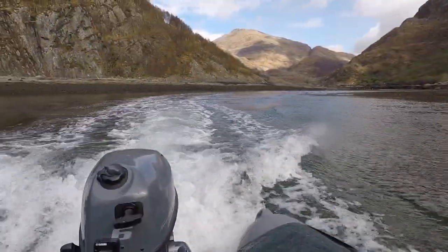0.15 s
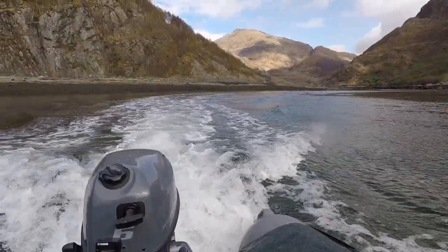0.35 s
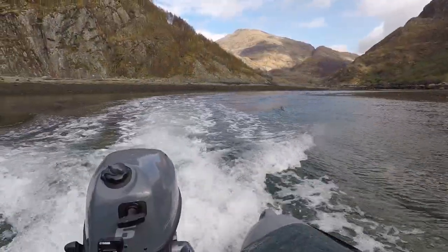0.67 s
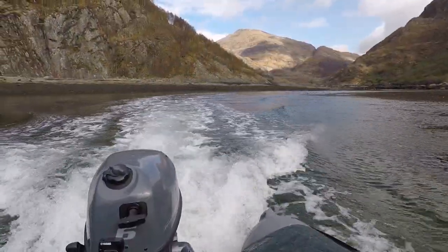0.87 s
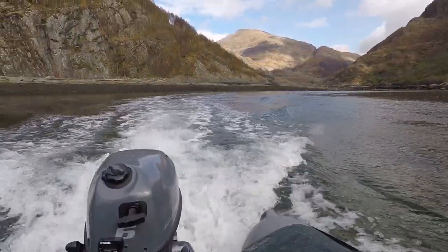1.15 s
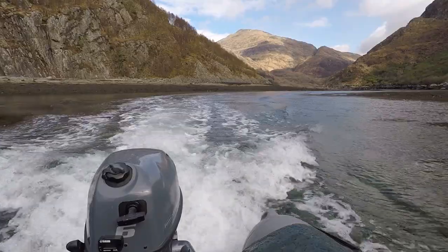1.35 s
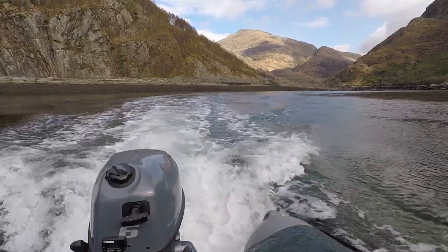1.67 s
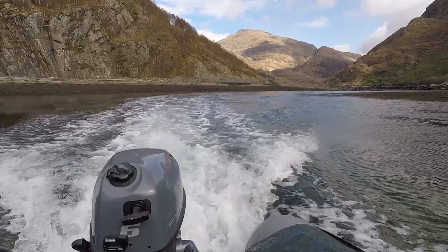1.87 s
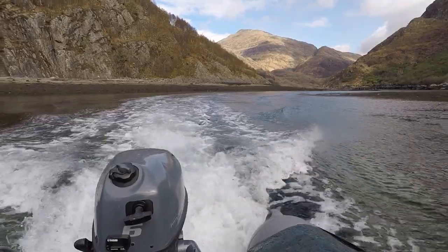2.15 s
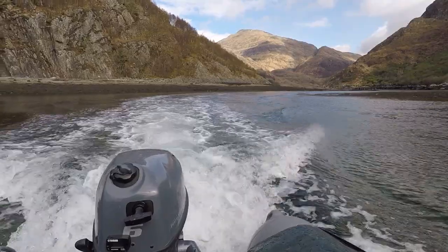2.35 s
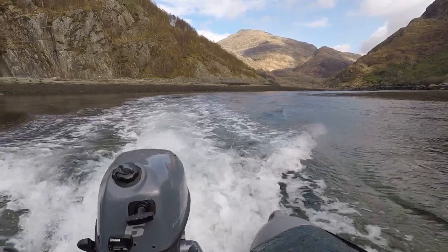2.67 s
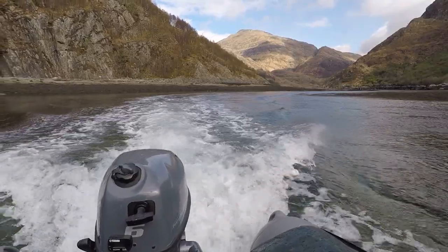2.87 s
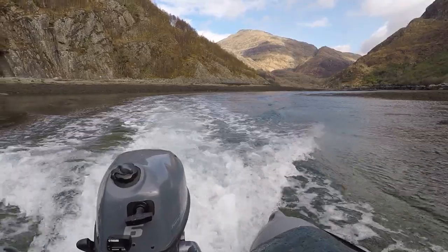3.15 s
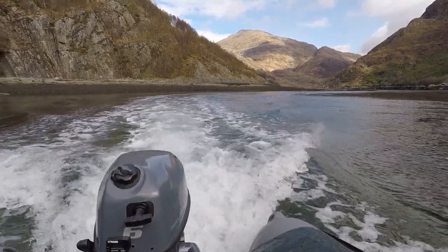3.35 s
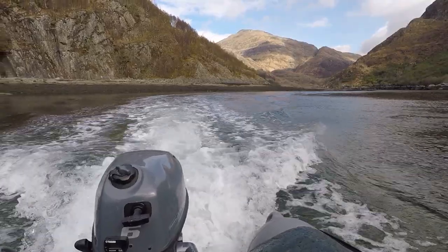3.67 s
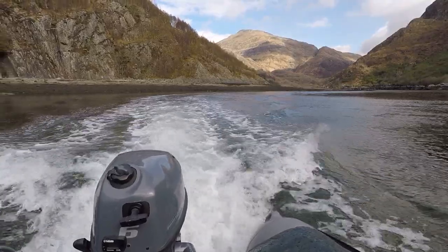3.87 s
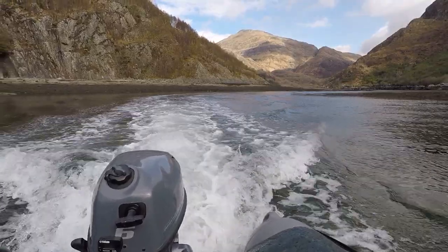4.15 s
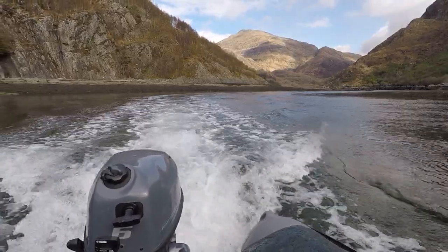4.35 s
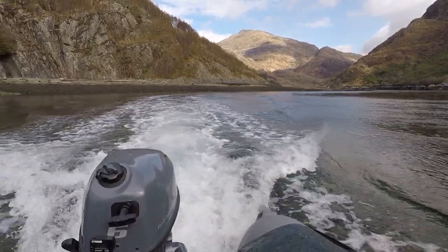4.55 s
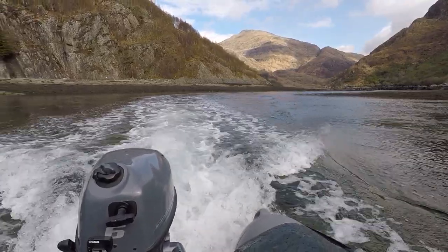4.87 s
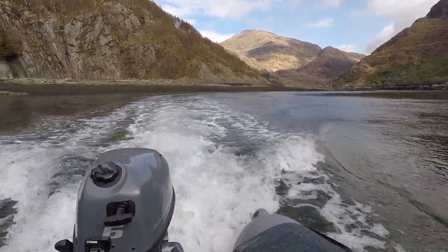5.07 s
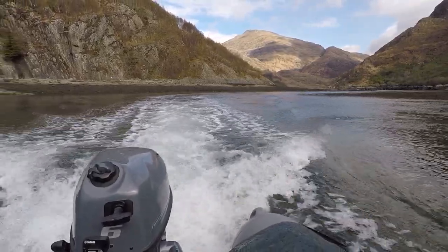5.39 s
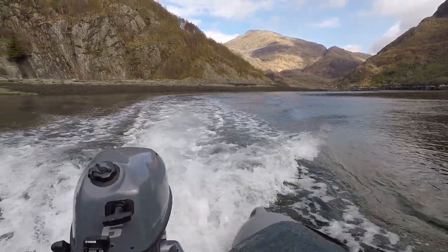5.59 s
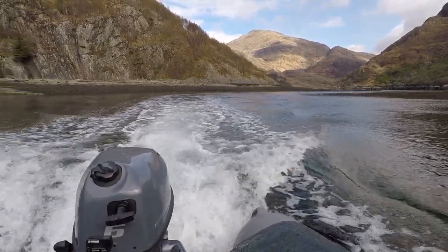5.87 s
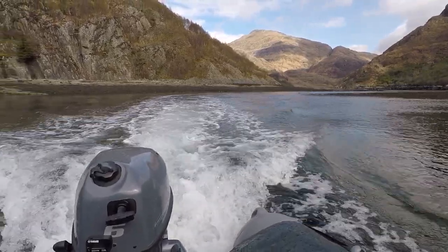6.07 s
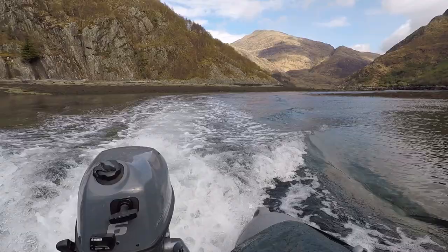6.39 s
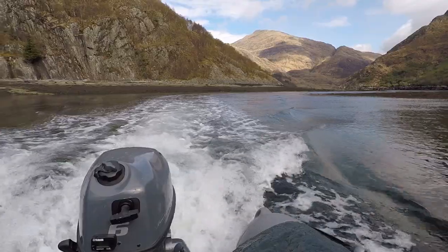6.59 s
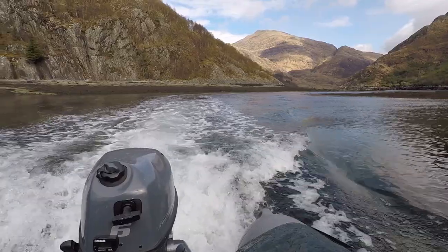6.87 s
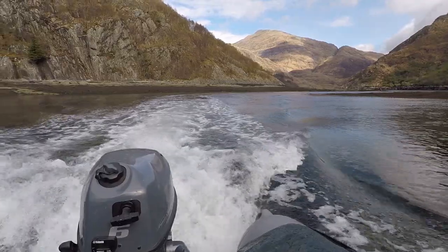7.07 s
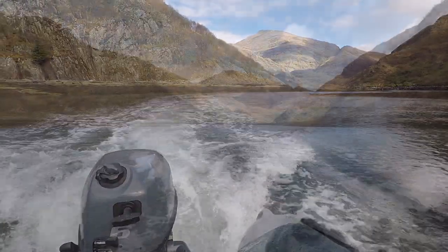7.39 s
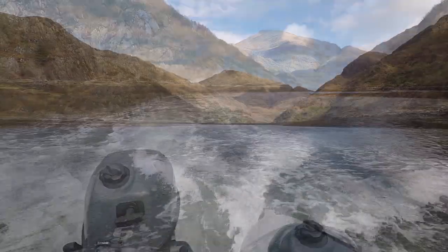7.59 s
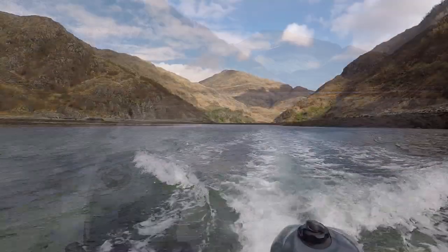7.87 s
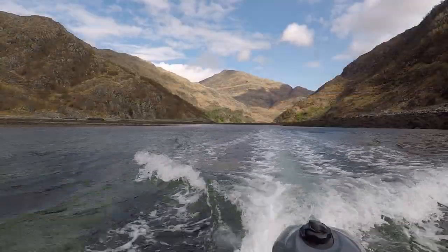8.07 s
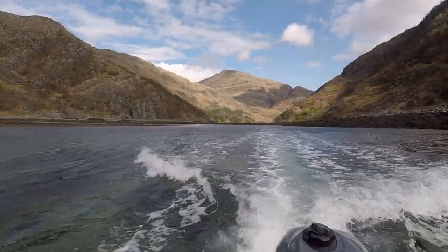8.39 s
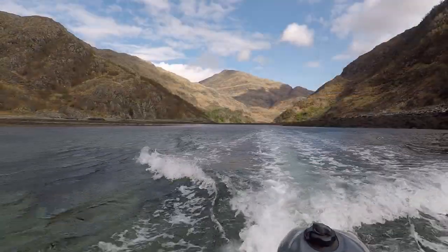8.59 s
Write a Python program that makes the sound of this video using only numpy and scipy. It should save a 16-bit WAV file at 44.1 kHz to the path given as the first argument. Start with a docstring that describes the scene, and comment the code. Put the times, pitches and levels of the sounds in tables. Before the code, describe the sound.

Close, loud one-cylinder boat engine with a rattling cowl, hissing spray and wind buffeting; it sags briefly and ends at a higher pitch.

```python
"""On the water in an inflatable boat: a small one-cylinder four-stroke outboard runs close to the microphone.
Each engine cycle thumps, barks from the exhaust and buzzes (sine waves), and rattles the cowl (shaped clicks).
Valve ticks, spray and the churning wake are shaped noise and droplets; wind noise buffets the microphone.
The motor sags and recovers a few times, the wash surges, and waves slap the hull.
Near the end the sound dissolves into a second stretch of the trip, with the motor a little faster."""
import sys
import numpy as np
from scipy import signal
from scipy.fft import rfft, irfft, next_fast_len
from scipy.io import wavfile
from scipy.ndimage import uniform_filter1d, minimum_filter1d

SR = 44100
rng = np.random.default_rng(int(sys.argv[2]) if len(sys.argv) > 2 else 0)


def transcribe(signal):
    """Save signal, clipped to [-1, 1], as a 16-bit WAV file at the path in sys.argv[1]."""
    frames = np.atleast_2d(signal).T
    limited = np.clip(frames, -1, 1)
    pcm = np.round(limited * 32767).astype(np.int16)
    wavfile.write(sys.argv[1], SR, pcm)


N = 385434
T = np.arange(N) / SR  # time of every sample, s


def undb(db):
    """Turn decibels into a gain."""
    return 10 ** (np.asarray(db) / 20)


def unit(x):
    """Scale a signal to an rms of one."""
    return x / np.sqrt(np.mean(x ** 2))


def ramp(start, length):
    """Rise in a straight line from 0 to 1; start and length in s."""
    return np.clip((T - start) / length, 0, 1)


def swell(start, attack, hold, release):
    """Rise to one, stay, then fall back; all times in s."""
    return ramp(start, attack) - ramp(start + attack + hold, release)


def walk(rate):
    """Drift smoothly at random, about rate times a second, with a spread of one."""
    step = 20  # work on every 20th sample, then fill in between
    white = rfft(rng.standard_normal(N // step))
    hz = np.arange(len(white)) * SR / N
    slow = unit(irfft(white / (1 + (hz / rate) ** 4)))
    return np.interp(np.arange(N) / step, np.arange(len(slow)), slow)


def colour(x, spectrum):
    """Give a white signal a spectrum (f/Hz, level/dB per Hz); the ring only follows each sound."""
    size = next_fast_len(N + SR // 2, real=True) // 2 * 2
    octave = np.log2(np.maximum(np.arange(size // 2 + 1) * SR / size, 1))
    hz, db = np.transpose(spectrum)
    table_octave = np.log2(hz)
    # beyond the table the level falls steeply, by up to 40 dB
    outside = np.abs(octave - np.clip(octave, table_octave[0], table_octave[-1]))
    shape_db = np.interp(octave, table_octave, db) - 20 * np.minimum(outside, 2)
    # folding the cepstrum forward in time keeps the ring from starting early
    cepstrum = irfft(np.log(undb(shape_db)))[:size // 2]
    cepstrum[1:] *= 2
    response = np.exp(rfft(cepstrum, size))
    return irfft(rfft(unit(x), size) * response)[:N] * np.sqrt(SR / 2)


def clicks(places, sizes):
    """Place clicks between samples by sharing each one between two neighbours."""
    out = np.zeros(N + 1)
    whole, part = np.divmod(np.clip(places, 0, N - 1), 1)
    whole = whole.astype(int)
    np.add.at(out, whole, sizes * (1 - part))
    np.add.at(out, whole + 1, sizes * part)
    return out[:N]


def droplets(rate, spread_db):
    """Scatter rate tiny bursts a second, a few of them much stronger than the rest."""
    when, strength, side = rng.random((int(rate * N / SR), 3)).T
    sizes = undb(-spread_db * np.log(np.maximum(strength, .002))) * np.sign(side - .5)
    return unit(clicks(np.floor(when * N), sizes))


# gusts over a light breeze: (t/s start, t/s hold, level/dB above the breeze)
GUSTS = [(-.1, .3, 8.5), (1.475, .44, 7), (7.3, 1.3, 8.5)]
BREEZE_DB, GUST_ATTACK_S, GUST_RELEASE_S = -.5, 0.18, 0.13


def gust_strength():
    """Wind strength as a gain: a light breeze with gusts that rise, hold and fall."""
    rises_db = sum(db * swell(s, GUST_ATTACK_S, hold, GUST_RELEASE_S) for s, hold, db in GUSTS)
    return undb(BREEZE_DB + rises_db)


# tone of the wind on the microphone, before the mix gains: (f/Hz, level/dB per Hz)
WIND = [(10, -55), (28, -41.5), (50, -39), (90, -41), (190, -47.5), (270, -53), (350, -56.5), (450, -66.5),
        (560, -86.5), (800, -71.5), (1100, -103)]


def wind(gust, eddy_db=2, flutter_db=-12, flutter_hz=220):
    """Eddies rumble on the microphone; strong gusts add a quicker, brighter flutter."""
    rumble = undb(-3) * gust ** .85 * colour(rng.standard_normal(N), WIND)
    highpass = signal.butter(2, flutter_hz, "high", fs=SR, output="sos")
    flutter = signal.sosfilt(highpass, colour(rng.standard_normal(N), WIND))
    # the flutter grows faster than the rumble as the gust strengthens
    flutter *= undb(flutter_db) * gust ** 2
    return (rumble + flutter) * undb(eddy_db * walk(13.3))


# the wash builds and settles again: (t/s start, t/s hold, level/dB)
SURGES = [(0, 0.82, 2.5), (3.05, 1.07, 1.5), (7.35, 0.24, 2)]
SURGE_RAMP_S = 0.13
# wash behind the transom in each stretch, and how much a slower motor churns less (dB per Hz of sag)
CRUISE_WASH_DB, FAST_WASH_DB, WASH_DB_PER_HZ = 3.5, 2.5, 2.5


def wash_level(sag_hz, second):
    """Wash level in dB: it eases when the motor sags, surges, and glides into the second stretch."""
    surges_db = sum(db * swell(s, SURGE_RAMP_S, hold, SURGE_RAMP_S) for s, hold, db in SURGES)
    cruise_db = CRUISE_WASH_DB - WASH_DB_PER_HZ * sag_hz
    return cruise_db * (1 - second) + FAST_WASH_DB * second + surges_db


# tone of the churning wake, before the wash level: (f/Hz, level/dB per Hz)
CHURN = [(400, -79), (570, -100), (680, -96), (780, -77.5), (900, -78), (1100, -87), (1450, -72.5),
         (1850, -78), (2400, -95)]
# waves slapping the hull: (t/s, level/dB above the wash)
SLAPS = [(7.75, -4), (8.29, 2)]


def wake(wash_db, surge_db=0.4, slap_decay_s=0.063):
    """Propeller wash: dense splashes that waver, and flare when a wave slaps the hull."""
    splashes = rng.standard_normal(N) + droplets(rate=900, spread_db=1.0)
    slaps = sum(undb(db) * (T > s) * np.exp(-np.abs(T - s) / slap_decay_s) for s, db in SLAPS)
    return colour(splashes * (1 + slaps), CHURN) * undb(wash_db + surge_db * walk(17))


# hiss of spray and valve gear in each stretch, before the hiss gain: (f/Hz, level/dB per Hz)
CRUISE_HISS = [(1200, -83.5), (2100, -75), (2700, -78), (3200, -76.5), (3550, -78.5), (4100, -73),
               (5500, -77.5), (6500, -75.5), (8000, -84.5), (9200, -83), (11500, -95), (14000, -102),
               (15000, -109)]
FAST_HISS = [(1200, -91), (2100, -80), (3100, -78.5), (3700, -82), (4500, -76), (5200, -83.5), (6600, -80),
             (8700, -85.5), (11200, -101), (12200, -99), (15000, -110)]
# knocks of piston and valves, relative levels:
# (place in the cycle 0-1, cowl rattle level/dB, bright tick level/dB)
KNOCKS = [(0.189, -1, 3.5), (0.244, -31, 0), (0.303, -0.5, -24), (0.498, 4.5, -2.5), (0.559, -6.5, -28),
          (0.689, -0.5, -3.5), (0.84, -1.5, -27)]


def hiss(cycle, spectrum, tick_db=3, tick_decay=0.022, spray_db=-4, flicker_db=0.19):
    """Valve ticks throb with every cycle over the fizz and spatter of the spray."""
    # each tick fades over a small part of the cycle; their powers add up
    tick_power = sum(undb(db) ** 2 * np.exp(-((cycle - place) % 1) / tick_decay)
                     for place, _, db in KNOCKS)
    ticks = np.sqrt(tick_power) * undb(tick_db + 2 * walk(30)) * rng.standard_normal(N)
    spray = rng.standard_normal(N) + undb(spray_db) * droplets(rate=3000, spread_db=2)
    return colour(ticks + spray * undb(flicker_db * walk(14)), spectrum)


# ring of the knocked cowl in each stretch, before the rattle gain: (f/Hz, level/dB per Hz)
CRUISE_COWL = [(1100, -90), (1300, -73), (1420, -70.5), (1560, -67.5), (1660, -71), (1810, -66.5),
               (1980, -68), (2100, -80), (3000, -93)]
FAST_COWL = [(1100, -82), (1300, -70), (1500, -92), (1600, -69), (1660, -80), (1740, -62), (1950, -79),
             (2300, -69.5), (3000, -91)]


def rattle(cycle, cowl, scatter_db, slack_s):
    """Piston and valves strike the cowl at set places in the cycle, never quite alike."""
    place, db, _ = np.transpose(KNOCKS)
    turns = np.arange(1, int(cycle[-1]) - 1)[:, None] + place
    late, force = rng.standard_normal((2,) + turns.shape)
    times = np.interp(turns, cycle, T) + slack_s * late
    sizes = undb(db + scatter_db * force)
    return colour(clicks(times.ravel() * SR, sizes.ravel()), cowl)


# strongest cowl tones in each stretch, before the rattle gain: (multiple of the firing rate, level/dB)
CRUISE_RING = [(29, -60), (36, -56), (39, -57), (41, -57), (42, -57), (44, -51), (47, -53), (49, -55),
               (50, -50), (53, -53), (55, -53)]
FAST_RING = [(34, -48.5), (36, -65), (41, -49), (42, -44.5), (45, -50), (46, -54), (49, -54)]


def ring(cycle, tones, waver_db=3.5):
    """Cowl panels sing on the multiples of the firing rate that they are tuned to."""
    singing = np.zeros(N)
    for order, db in tones:
        tone = np.sqrt(2) * np.sin(2 * np.pi * (round(order) * cycle + rng.random()))
        singing += undb(db + waver_db * walk(6.6)) * tone
    return singing


# overtones of the drone in each stretch, relative levels: (multiple of the firing rate, level/dB)
CRUISE_ORDERS = [(1, -8), (2, 0), (3, -5), (4, -2), (5, -17), (6, -7), (7, -14), (8, -13), (9, -13),
                 (10, -21), (11, -23), (12, -25), (13, -28), (14, -36), (15, -55), (16, -54), (17, -48),
                 (18, -45), (19, -43), (20, -40), (21, -32), (22, -31), (23, -39), (24, -36), (25, -39),
                 (26, -41), (27, -43), (28, -46)]
FAST_ORDERS = [(1, -12), (2, 0.5), (3, -2), (4, -8), (5, -11), (6, -12), (7, -22), (8, -48), (9, -15),
               (10, -13.5), (11, -16), (12, -42), (13, -34.5), (14, -43), (15, -52), (16, -40.5),
               (17, -36.5), (18, -38), (19, -32), (20, -35), (21, -35), (22, -31.5), (23, -45), (24, -36),
               (25, -39), (26, -36)]
# gas pulses of one cycle, the exhaust blow-down first: (place in the cycle 0-1, size; suction is negative)
PUFFS = [(.35, 1), (.767, -.38), (.033, .42)]
# the thump and the bark dip a little in a gust (dB per dB of gust)
DUCK_DB_PER_DB = 0.14


def drone(cycle, orders, gust, effort_db, bark_db, buzz_db=-0.5, thump_rough=0.033, bark_rough=0.078,
          buzz_waver_db=2.5):
    """Each cycle thumps the hull, barks from the exhaust and buzzes the casing; gusts shake thump and bark."""
    thump, bark, buzz = np.zeros((3, N))
    thump_place, hull_order, hull_q = .93, 3.6, 5  # cycle place, resonance (multiple of firing rate), sharpness
    for order, (_, db) in enumerate(orders, 1):
        if order <= 4:
            # above its resonance the hull moves against the push, which spreads the thump over the cycle
            ratio = order / hull_order
            lag = np.arctan2(ratio / hull_q, 1 - ratio ** 2)
            thump += undb(db) * np.cos(2 * np.pi * order * (cycle - thump_place) - lag)
        elif order <= 15:
            # the gas pulses set the timing of these overtones
            puffs = sum(size * np.exp(-2j * np.pi * order * place) for place, size in PUFFS)
            bark -= undb(db) * np.sin(2 * np.pi * order * cycle + np.angle(puffs))
        else:
            tone = np.sin(2 * np.pi * (order * cycle + rng.random()))
            buzz += undb(db + buzz_waver_db * walk(6)) * tone
    thump *= 1 + thump_rough * gust * walk(6.5)
    bark *= (1 + bark_rough * gust * walk(13)) * undb(bark_db)
    ducked = (thump + bark) / gust ** DUCK_DB_PER_DB
    return unit(ducked + undb(buzz_db + effort_db) * buzz)


# the propeller meets more drag, the motor sags and recovers:
# (t/s start, t/s fall, t/s recovery, f/Hz drop of the firing rate)
SAGS = [(0, 0.3, .5, 0.26), (1.52, 0.22, 0.73, 0.67), (5.25, 0.1467, 0.307, 0.346), (5.598, 0.46, .55, .7)]


def speed_sag():
    """Drop of the firing rate in Hz while the propeller meets more drag."""
    return sum(drop * swell(s, fall, 0, recovery) for s, fall, recovery, drop in SAGS)


def crank(speed, wander):
    """Count engine cycles from the start; the propeller load makes the speed waver."""
    return np.cumsum(speed * (1 + wander * walk(4.4))) / SR


RATTLE_DB_PER_HZ = 4.5  # a slower motor rattles and buzzes less (dB per Hz of sag)


def outboard(steady_hz, sag_hz, orders, tones, cowl, treble, gust, bark_db, drone_db, rattle_db, hiss_db):
    """One crank drives the drone, the cowl and the ticking; rattle and buzz ease when it slows."""
    cycle = crank(steady_hz - sag_hz, wander=0.00098)
    effort_db = -RATTLE_DB_PER_HZ * sag_hz
    panels = rattle(cycle, cowl, scatter_db=2, slack_s=.00003) + ring(cycle, tones)
    panels *= undb(rattle_db + effort_db)
    low_drone = undb(drone_db) * drone(cycle, orders, gust, effort_db, bark_db)
    return low_drone + panels + undb(hiss_db) * hiss(cycle, treble)


CRUISE_HZ, FAST_HZ = 36.23, 38.18  # firing rate at steady throttle in each stretch
# the exhaust bark changes steadily (dB per s) through its nominal level at this time (s)
BARK_RISE_DB_PER_S, BARK_NOMINAL_S = 0.17, 4.7
OPENING_GAIN, FADE_IN_S = 0.54, 0.99  # the sound fades in from part level
DISSOLVE_AT_S, DISSOLVE_S = 7.28, 0.76  # start and length of the dissolve


def scene():
    """The first stretch fades in and dissolves at equal power into the second, over wake and wind."""
    gust = gust_strength()
    sag_hz = speed_sag()
    rising_db = BARK_RISE_DB_PER_S * (T - BARK_NOMINAL_S)
    cruise = outboard(CRUISE_HZ, sag_hz, CRUISE_ORDERS, CRUISE_RING, CRUISE_COWL, CRUISE_HISS, gust,
                      bark_db=rising_db, drone_db=-11.9, rattle_db=-3.0, hiss_db=0)
    fast = outboard(FAST_HZ, 0, FAST_ORDERS, FAST_RING, FAST_COWL, FAST_HISS, gust,
                    bark_db=-0.4, drone_db=-11.5, rattle_db=-7.0, hiss_db=1)
    second = ramp(DISSOLVE_AT_S, DISSOLVE_S)
    motor = cruise * np.sqrt(1 - second) + fast * np.sqrt(second)
    water = wake(wash_level(sag_hz, second))
    fade_in = OPENING_GAIN ** (1 - ramp(0, FADE_IN_S))
    soft_ends = np.minimum(np.minimum(T, T[-1] - T) / .005, 1)  # 5 ms at each end
    return (soft_ends * fade_in * (motor + water + wind(gust)))[None]


TOP_HZ = 15150  # highest pitch that is let through


def record(dry):
    """A look-ahead limiter holds down loud peaks, then a steep filter cuts the top."""
    ceiling, hold = .8, int(.02 * SR)  # peak level, smoothing length in samples
    allowed = ceiling / np.maximum(np.abs(dry), ceiling)
    gain = uniform_filter1d(minimum_filter1d(allowed, hold), hold)
    lowpass = signal.ellip(10, .2, 80, TOP_HZ, fs=SR, output="sos")
    return signal.sosfilt(lowpass, dry * gain)


dry = scene()
out = record(dry)
transcribe(out)
```